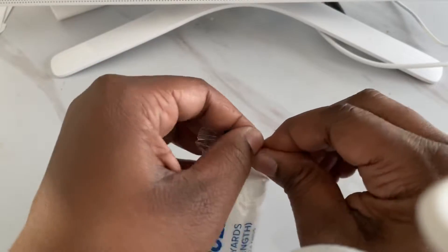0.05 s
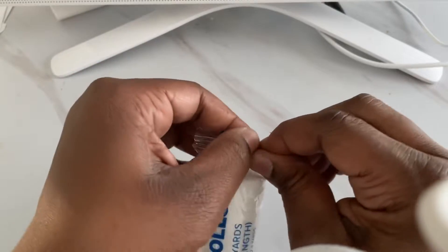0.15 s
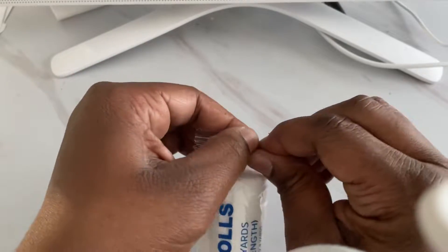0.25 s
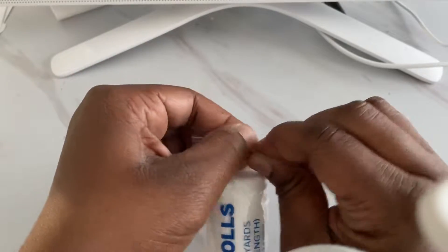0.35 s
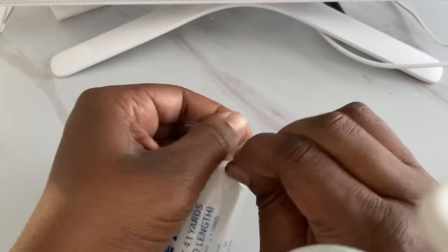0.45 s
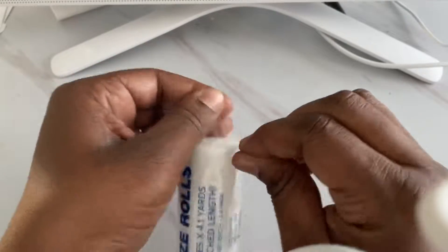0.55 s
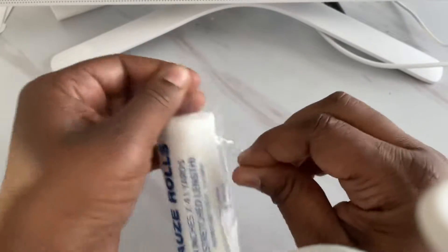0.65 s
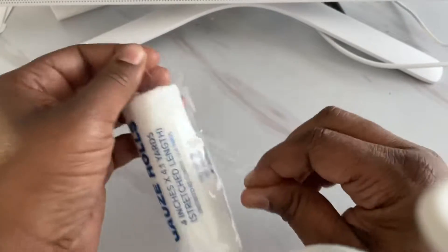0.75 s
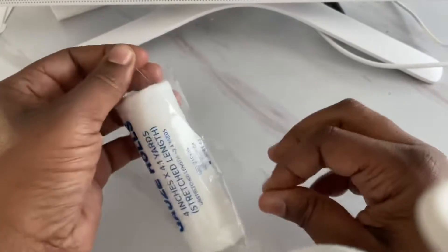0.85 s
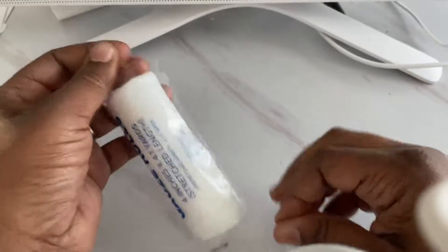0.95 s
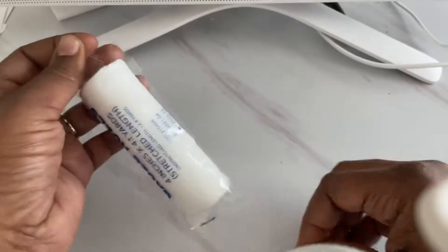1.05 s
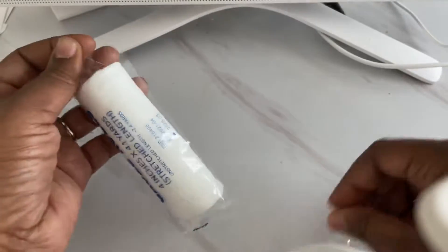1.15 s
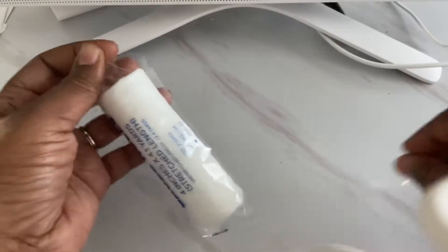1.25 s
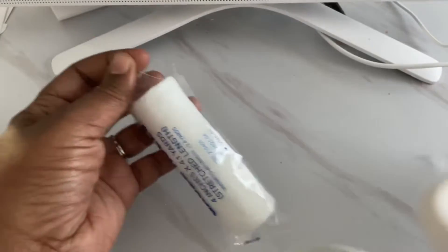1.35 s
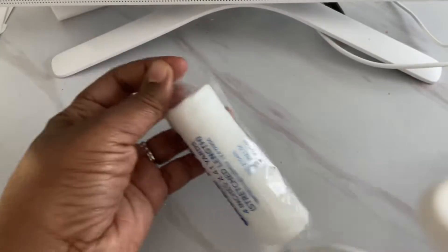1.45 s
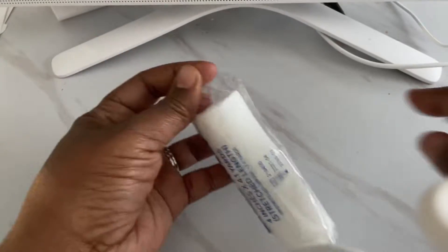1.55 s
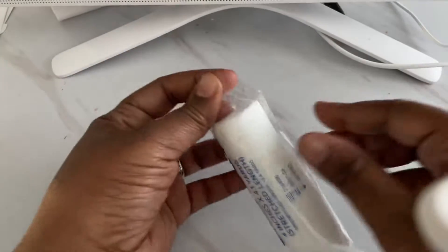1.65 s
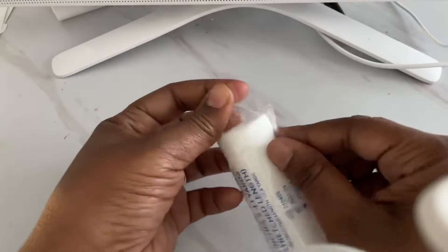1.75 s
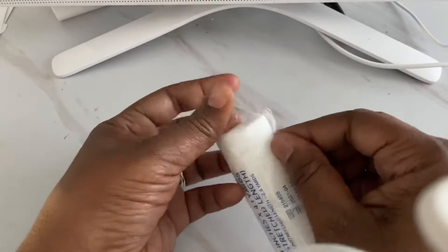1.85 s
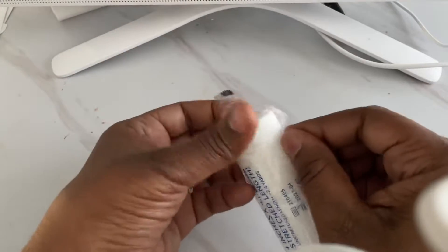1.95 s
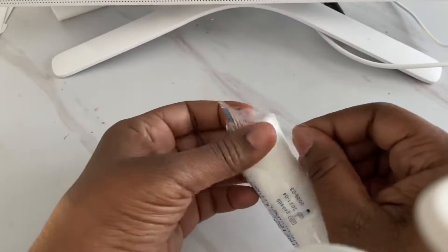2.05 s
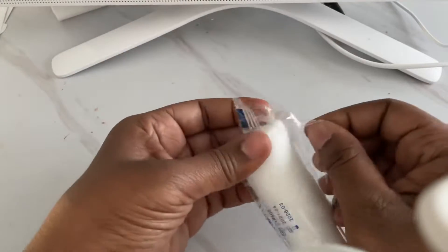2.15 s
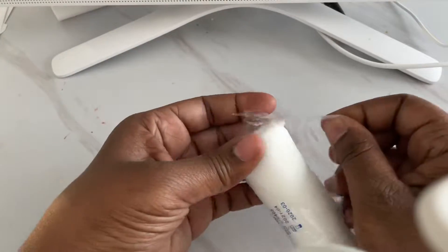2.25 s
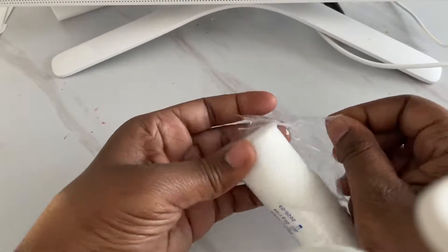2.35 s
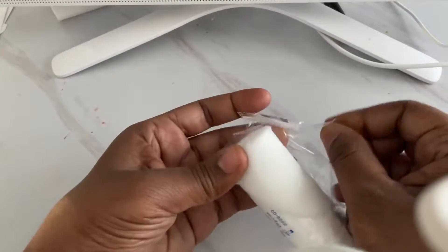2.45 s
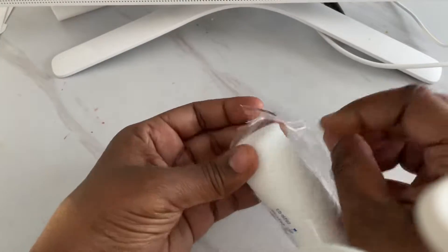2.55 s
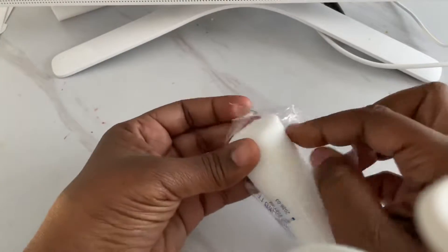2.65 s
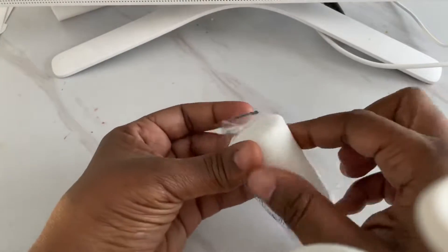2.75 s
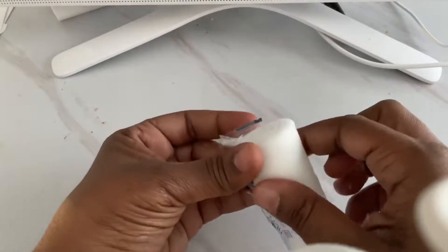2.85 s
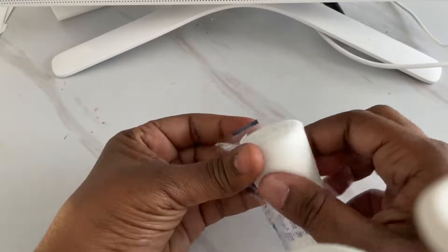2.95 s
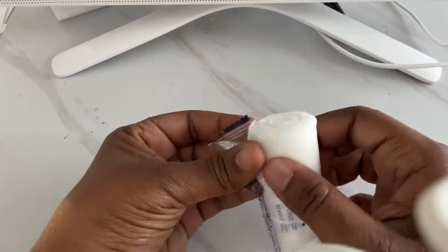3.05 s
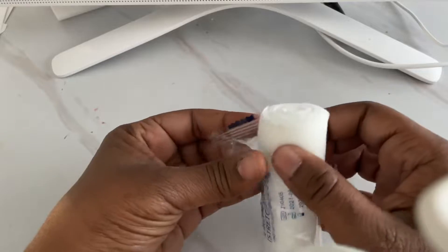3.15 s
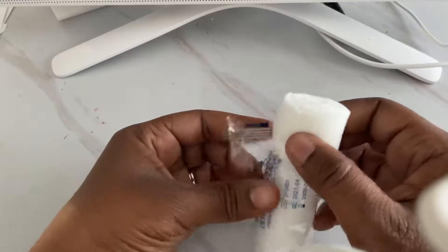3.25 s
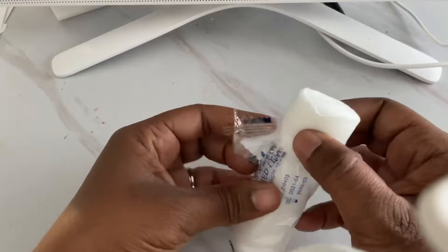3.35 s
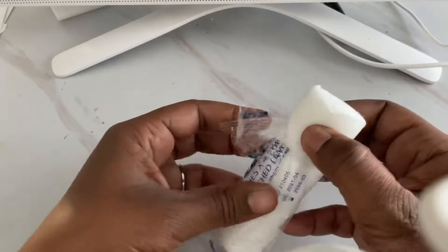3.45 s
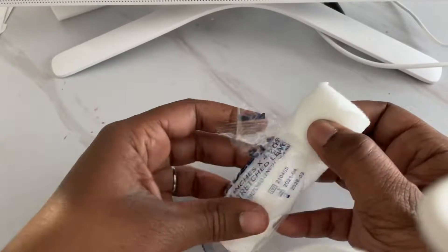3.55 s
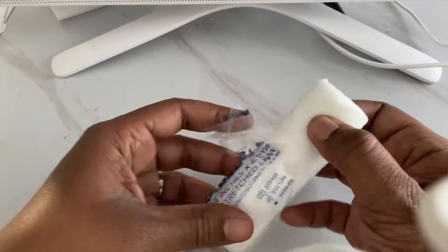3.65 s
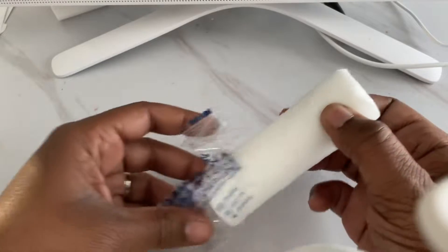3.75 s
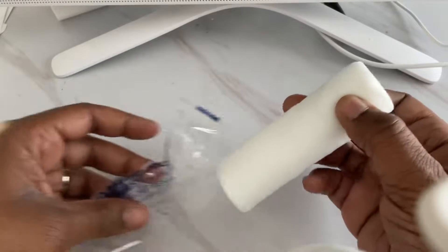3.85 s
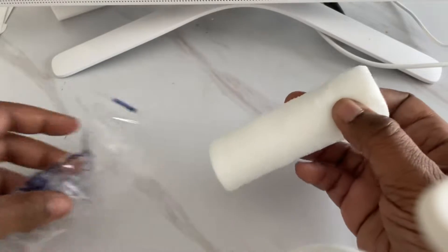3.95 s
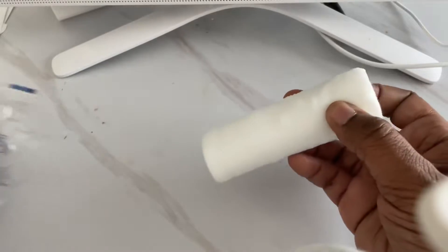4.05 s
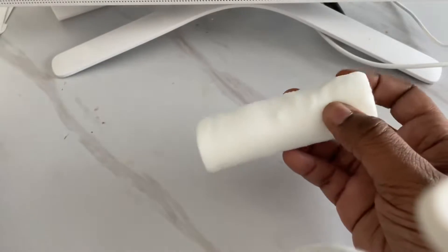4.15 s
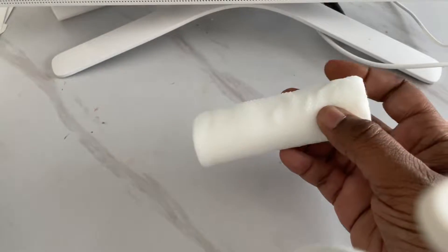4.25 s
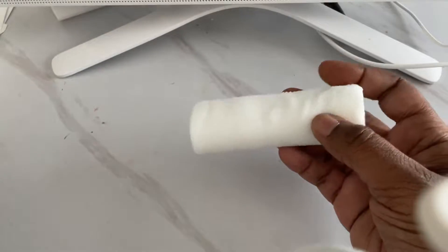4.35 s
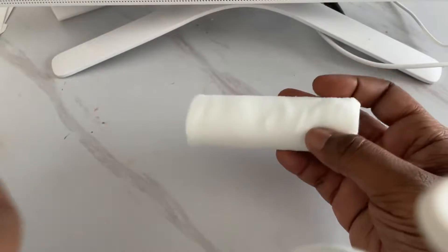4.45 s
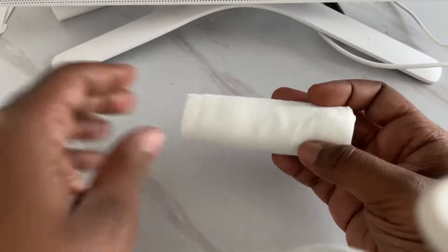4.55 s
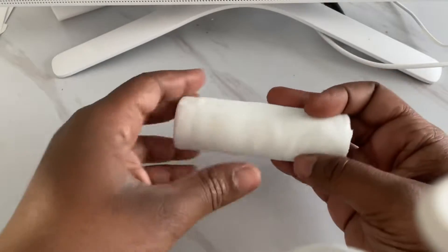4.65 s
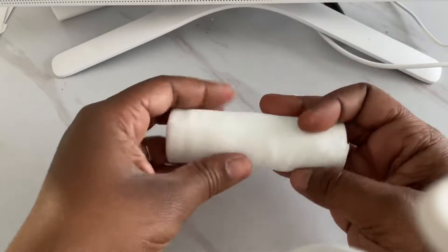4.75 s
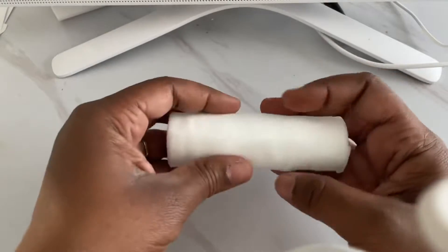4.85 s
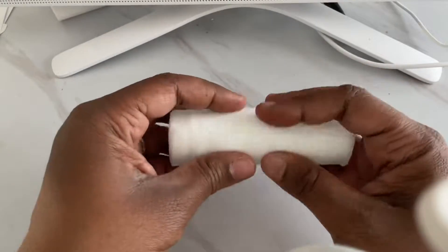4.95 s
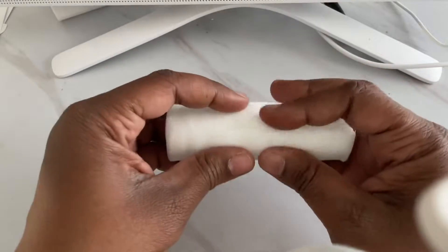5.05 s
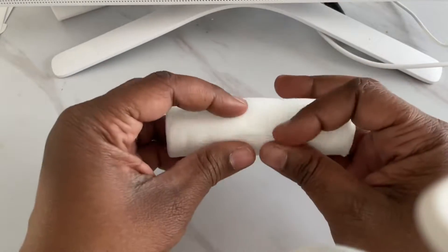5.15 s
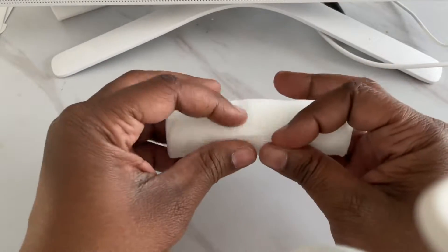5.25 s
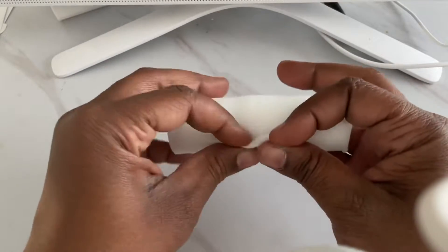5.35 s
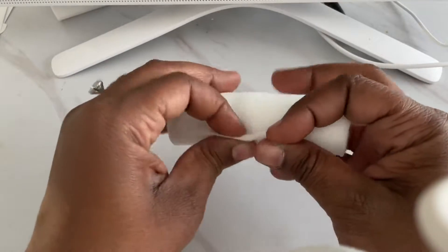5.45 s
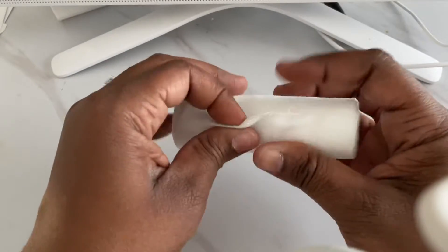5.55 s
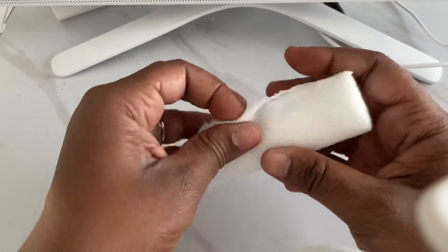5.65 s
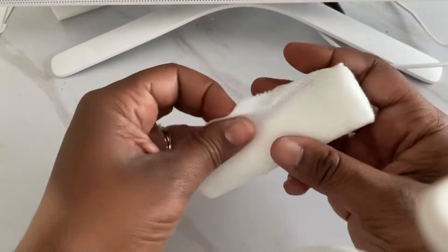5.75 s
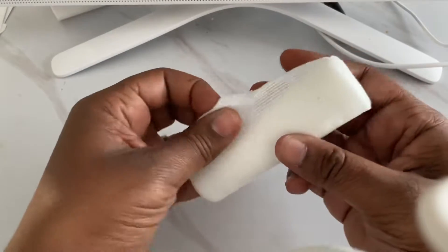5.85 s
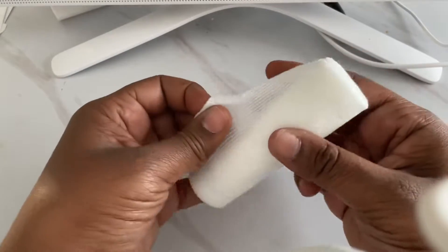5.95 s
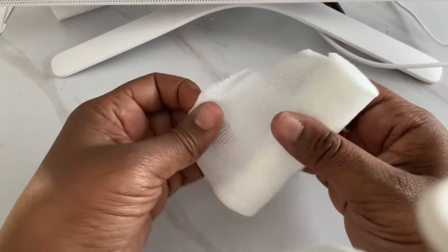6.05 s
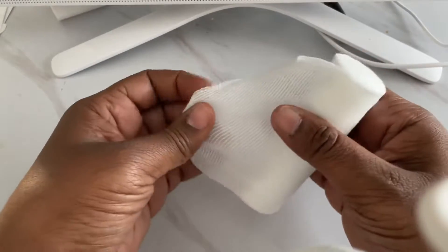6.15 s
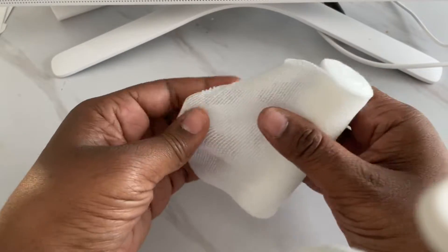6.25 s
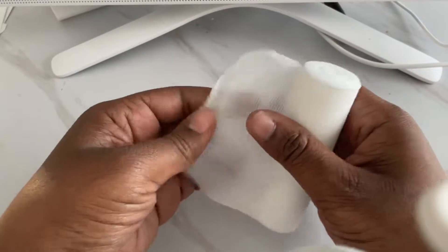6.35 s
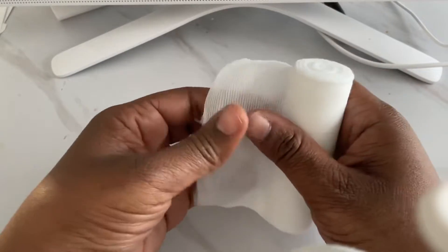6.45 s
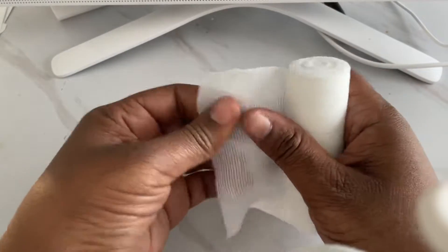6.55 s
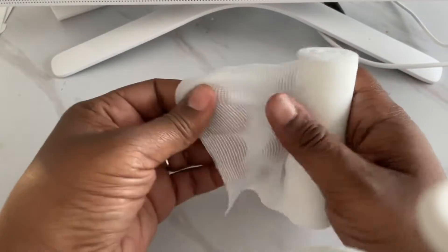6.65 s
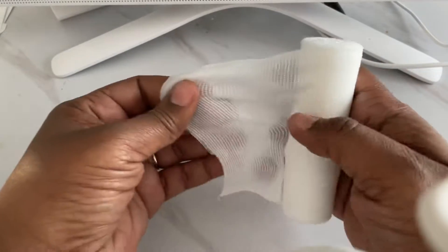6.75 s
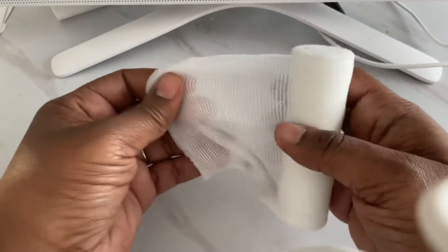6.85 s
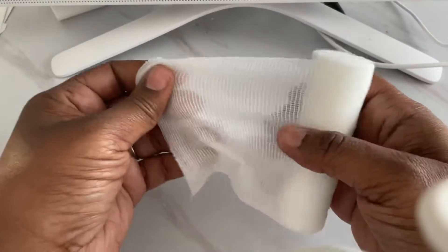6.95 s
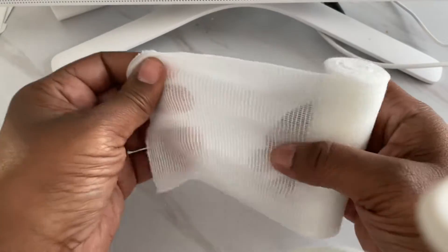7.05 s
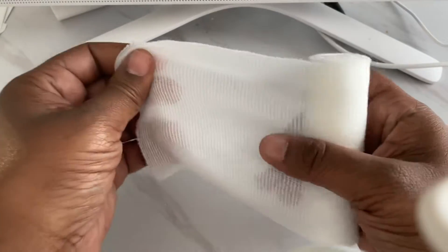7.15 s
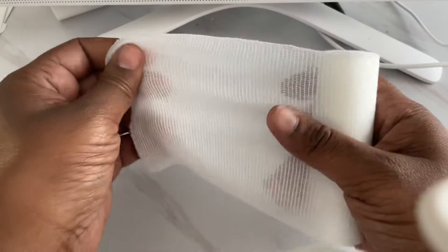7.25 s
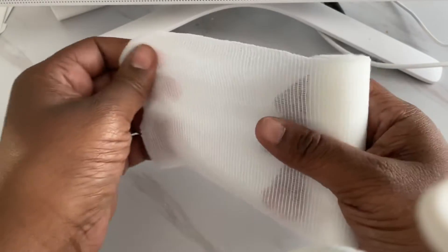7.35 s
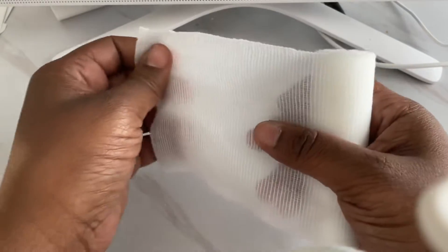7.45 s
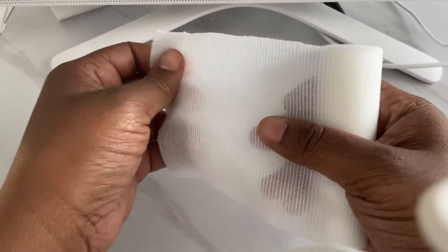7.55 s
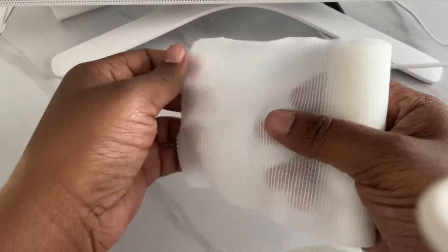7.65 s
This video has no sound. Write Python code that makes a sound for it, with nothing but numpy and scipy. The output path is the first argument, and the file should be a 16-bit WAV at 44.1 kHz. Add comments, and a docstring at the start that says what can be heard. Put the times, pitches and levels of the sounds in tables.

```python
"""A faint appliance hum and a fine crackle open the scene, close to the microphone: fingers grip thin plastic film.
They pinch and tear this wrapper off a gauze roll: creases buckle as dispersed, falling chirps that ring their folds.
The crackle is many tiny buckles, driven by the strain of each grip and fading as the film relaxes.
Damped modes give soft bumps on the roll, thin snaps give ticks, and shaped noise with thread plucks gives gauze strokes.
A band-by-band decaying echo makes the small room ring faintly."""
import sys
import numpy as np
from scipy import signal
from scipy.fft import rfft, irfft, next_fast_len
from scipy.io import wavfile
from scipy.ndimage import uniform_filter1d

SR = 44100
rng = np.random.default_rng(int(sys.argv[2]) if len(sys.argv) > 2 else 0)


def unload_audio(sound):
    """Save the sound as a 16-bit wav file, at the path given as the first command line argument."""
    columns = np.transpose(np.atleast_2d(sound))
    # keep every value between -1 and 1, then stretch to whole-number steps
    steps = np.round(np.clip(columns, -1, 1) * 32767)
    wavfile.write(sys.argv[1], SR, steps.astype(np.int16))


N = 339570
TIME = np.arange(N) / SR
PORTS = np.array([[.5], [-.5]])   # shares a left-right difference between the two channels
SNAP_SIZE, SNAP_LEAD = 1024, 128   # samples
SNAP_HZ = np.maximum(np.fft.rfftfreq(SNAP_SIZE, 1 / SR), 1)


def from_db(db):
    """Level law: amplitude is ten to the power of level over 20."""
    return 10 ** (np.asarray(db) / 20)


def rms_one(x):
    """Power normalisation: unit mean square."""
    return x / np.sqrt(np.mean(x ** 2) + 1e-20)


def at_hz(points, hz, axis=1):
    """Log-frequency interpolation of one column of a spectrum."""
    points = np.array(points)
    return np.interp(np.log(hz), np.log(points[:, 0]), points[:, axis])


def butter(x, hz, kind, order=2):
    """Butterworth filtering: a maximally flat pass band."""
    return signal.sosfilt(signal.butter(order, hz, kind, fs=SR, output="sos"), x)


def add(out, sound, start):
    """Superposition: mix a sound in from a given sample on."""
    start = int(np.clip(start, 0, N - 1))
    out[..., start:start + sound.shape[-1]] += sound[..., :N - start]


def drift(rate):
    """Random modulation: straight lines join normal draws of spread 1, at `rate` draws per second."""
    knots = rng.standard_normal(4096)
    return np.interp(TIME * rate, np.arange(len(knots)), knots)


# left-right coherence of a diffuse field: f/Hz, correlation
COHERENCE = [(60, .93), (300, 0.8), (700, 0.47), (1500, 0.82), (3000, 0.73), (7000, 0.18), (15000, 0.034)]


def diffuse_noise(colour, size=N):
    """Diffuse-field coherence: coloured stereo noise of rms 1, its ports most alike in the bass."""
    padded = next_fast_len(size)
    hz = np.maximum(np.fft.rfftfreq(padded, 1 / SR), 1)
    mid, side = rfft(rng.standard_normal((2, padded)))
    alike = np.clip(at_hz(COHERENCE, hz), -1, 1)
    both = np.sqrt(1 + alike) * mid + np.sqrt(1 - alike) * side * [[1], [-1]]
    return rms_one(irfft(both * from_db(at_hz(colour, hz)), padded)[:, :size])


# spectral density of the room background: f/Hz, relative level/dB per Hz
RUMBLE_COLOUR = [(20, -23), (35, -10), (55, 8.5), (75, 1.5), (100, -0.5), (170, -5), (230, -9.5),
                 (350, -19), (550, -33), (800, -28.5), (1200, -38), (2500, -33), (6500, -38), (8300, -57),
                 (11000, -36.5), (15500, -58)]


def appliance(hum_hz=120, hum_db=-48.5, rumble_db=-54, pan_db=-2.5, waver_db=2.0):
    """Mains-driven vibration: a wavering hum at twice the mains frequency, slightly right, over low rumble."""
    level_db = hum_db + waver_db * drift(7.9) + pan_db * PORTS
    hum = np.sqrt(2) * np.sin(2 * np.pi * hum_hz * TIME) * from_db(level_db)
    return hum + from_db(rumble_db) * diffuse_noise(RUMBLE_COLOUR)


def gesture(start, length, attack_db_per_s, release_db_per_s):
    """Exponential envelope: level in dB of one hand movement that swells, holds at 0 and dies away."""
    before = np.maximum(start - TIME, 0)
    after = np.maximum(TIME - start - length, 0)
    return -np.maximum(attack_db_per_s * before, release_db_per_s * after)


# pinches and pulls on the wrapper: t/s, length/s, relative level of the crackle body/dB, sizzle above the body/dB
GRIP_EVENTS = [(0, 0.12, -52.5, 1), (0.196, 0.0073, -43.5, 7.5), (0.422, 0.047, -33.5, 4.5),
               (0.517, 0.098, -39.5, 4), (0.654, 0.068, -38.5, 2), (0.823, 0.0075, -46.5, 6.5),
               (0.957, 0.11, -58.5, 8), (1.227, 0.079, -62, 4), (1.346, 0.11, -64, 11.5),
               (1.787, 0.13, -39.5, 2.5), (2.029, 0.073, -36.5, 3.5), (2.129, 0.27, -33, 5.5),
               (2.283, 0.084, -32.5, 7), (2.524, .17, -35.5, 4), (2.761, 0.087, -38, 5.5),
               (2.968, 0.14, -44, 7), (3.144, 0.063, -41.5, 4.5), (3.248, 0.1, -39, 2),
               (3.38, .11, -52, 6.5), (3.472, 0.076, -36.5, 3), (3.611, 0.2, -42.5, 8),
               (3.784, 0.084, -35.5, 1.5), (4.109, 0.019, -38.5, 0), (4.65, 0.029, -50, -2)]


def strain(attack_db_per_s=901.5, release_db_per_s=453, relax_db=-13, relax_db_per_s=61.5):
    """Stress relaxation: the strongest grip, or its slow creaking afterwards, sets body and sizzle in dB."""
    body = sizzle = np.full(N, -120.)
    for s, length, db, bright_db in GRIP_EVENTS:
        held = gesture(s, length, attack_db_per_s, release_db_per_s)
        relaxing = relax_db + gesture(s, length, attack_db_per_s, relax_db_per_s)
        level = db + np.maximum(held, relaxing)
        body = np.maximum(body, level)
        sizzle = np.maximum(sizzle, level + bright_db)
    return body, sizzle


def resonance(hz, q, gain_db):
    """Resonance: unity response plus a peak whose width is its frequency over q."""
    detune = SNAP_HZ / hz - hz / SNAP_HZ
    return 1 + (from_db(gain_db) - 1) / (1 + 1j * q * detune)


def crease_paths(fold_hz, scatter_db, scatter_s=.003, spread_s=.000004, count=16):
    """Multipath superposition: spectra at both ports of a swell of tiny flips and its scattered echoes."""
    swell_s = 0.0003343 * (3000 / fold_hz) ** .3   # small, high folds give way faster
    flips = rng.gamma(3, swell_s, count)
    # echoes off hands and table follow the flips
    delay = np.r_[flips, rng.exponential(scatter_s, count) + 2 * swell_s]
    size = np.r_[np.exp(-flips / (10 * swell_s)), np.full(count, from_db(scatter_db))]
    height = rng.choice([-1, 1], 2 * count) * size
    # each path has its own direction, and all share one more
    lag = spread_s * (rng.standard_normal(2 * count) + rng.standard_normal()) / 2
    arrival = np.array([delay - lag, delay + lag]) - np.median(flips)
    return (height[:, None] * np.exp(-2j * np.pi * arrival[..., None] * SNAP_HZ)).sum(1)


def table_echo(delay_s=0.0021, echo_db=-10, spread=.12):
    """Comb filtering: the table top returns each snap after a delay varying with the height of the hands."""
    echo_s = delay_s * np.exp(spread * rng.standard_normal())
    return 1 + from_db(echo_db) * np.exp(-2j * np.pi * echo_s * SNAP_HZ)


def bending_phase(travel_s=.0015):
    """Bending-wave dispersion: delay is travel * (sqrt(1 kHz / f) - 1/2), so treble arrives first."""
    travel = travel_s * np.exp(rng.normal(0, .3))
    return 2 * np.pi * travel * (2 * np.sqrt(1e3 * SNAP_HZ) - SNAP_HZ / 2)


# phase between the two microphone ports: f/Hz, lead of the left port/rad
PORT_LEAD = [(100, 1.2), (1500, -0.13), (2700, 1.5), (4000, 0.06), (5000, 0.91), (6200, 1.02),
             (7000, -1.04), (7800, -3), (8700, -3.5), (10600, -6), (12200, -6.5), (14000, -9), (15500, -9)]
# level between the two microphone ports: f/Hz, left minus right level/dB
PORT_LEVEL = [(200, 0), (1000, 2.4), (2700, 2.5), (4800, 4), (7000, 1.1), (9000, 0), (15000, 0)]


def snap(colour, fold_hz, fold_db, fold_q=2.3, overtone_db=3.5, overtone_q=3.8, scatter_db=-17,
         splay=0.8, splay_hz=3300, lead_s=0):
    """Snap-through buckling: tiny flips launch a dispersed bending wave that rings the fold and taut facets."""
    paths = crease_paths(fold_hz, scatter_db)
    for hz in np.exp(rng.uniform(np.log(1800), np.log(14000), size=6)):   # facets ring at their own pitches
        paths *= resonance(hz, overtone_q, overtone_db)
    # level the broad spectrum, keep its fine structure
    paths /= np.sqrt(uniform_filter1d(np.mean(abs(paths) ** 2, 0), size=41) + 1e-9)
    detune = SNAP_HZ / fold_hz - fold_hz / SNAP_HZ
    fold = resonance(fold_hz, fold_q, fold_db)
    fold *= from_db(-.55 * fold_db / (1 + detune ** 2))   # the ring draws its energy from nearby frequencies
    paths *= table_echo()
    bend = bending_phase()
    gain = from_db(at_hz(colour, SNAP_HZ) + PORTS * at_hz(PORT_LEVEL, SNAP_HZ))
    # each snap faces its own way, heard most in the middle range
    aim = splay * rng.standard_normal() * np.exp(-np.log(SNAP_HZ / splay_hz) ** 2)
    aim += 2 * np.pi * np.minimum(lead_s * SNAP_HZ, 1)   # a time lead in the lower range, one turn at most
    phase = PORTS * (at_hz(PORT_LEAD, SNAP_HZ) + aim) - bend
    wave = irfft(paths * fold * gain * np.exp(1j * phase))
    return np.roll(wave, SNAP_LEAD, axis=1) * signal.windows.tukey(SNAP_SIZE, .2)


# spectral density of the fine crackle: f/Hz, relative level/dB per Hz
FINE_CRACKLE_COLOUR = [(100, -24.5), (250, -4), (450, -12.5), (950, 1), (1500, 6), (1750, -1.5), (2100, 7),
                       (3500, 2), (5800, -3), (8000, -4), (11000, -5.5), (15500, -26.5)]


def crackle(body, sizzle, per_s=600, size_db=4.0, clump_db=3.0, body_db=-2.0, sizzle_db=-3, hiss_db=-35,
            fold_db=7, tilt_db=4.0, size=130, count=120):
    """Crackling noise: clumped random buckles excite a new fold every `size` samples, about 3 ms."""
    born = rng.random(N) < per_s / SR
    sizes = born * from_db(size_db * np.minimum(rng.exponential(1, N), 3))
    sizes += from_db(hiss_db) * rng.standard_normal(N)
    sizes *= from_db(clump_db * np.tanh(drift(110)))
    sizes /= np.sqrt(uniform_filter1d(sizes ** 2, size=2400) + 1e-12)   # a steady pull releases steady energy
    folds = []
    for fold_hz in np.geomspace(1200, 12000, count):
        tilt = tilt_db * np.clip(rng.standard_normal(), -2, 2)   # some folds are bright, some dull
        colour = [(hz, db + tilt * np.log(hz / 3300)) for hz, db in FINE_CRACKLE_COLOUR]
        folds.append(snap(colour, fold_hz, fold_db))
    film, end = np.zeros((2, N)), int((GRIP_EVENTS[-1][0] + .5) * SR)
    for start in range(0, end, size):
        fold = folds[rng.integers(count)]
        grains = np.array([np.convolve(sizes[start:start + size], port) for port in fold])
        add(film, grains, start - SNAP_LEAD)
    low = butter(film, 3700, "low", order=3)
    high = butter(film, 3000, "high", order=3)
    low *= from_db(body + body_db) / low[:, :end].std()
    high *= from_db(sizzle + sizzle_db) / high[:, :end].std()
    return low + high


def tilted(colour, tilt, pivot_hz=3100):
    """Spectral tilt in dB per octave about a pivot: small, tight creases are bright, wide ones dull."""
    return [(hz, db + tilt * np.log2(np.clip(hz, 650, 11500) / pivot_hz)) for hz, db in colour]


# spectral density shared by all film snaps before tilting: f/Hz, relative level/dB per Hz
FILM_SNAP_COLOUR = [(60, -30), (300, -19), (650, -5), (1800, 1.5), (5000, -0.74), (8500, 0), (11500, -5),
                    (15500, -7.5)]


def lesser_creases(sizzle, above_db=18.5, spread_db=5.0, tilt_db=2.5, tilt_spread_db=5.5, fold_db=11, count=130):
    """Strain-limited buckling: smaller snaps at random times, their strength following the sizzle level."""
    out, end = np.zeros((2, N)), int(sum(GRIP_EVENTS[-1][:2]) * SR)
    for k, (when, size, tilt, pitch) in enumerate(rng.uniform(-1.3, 1, (count, 4))):
        start = int((k + (1 + when) / 2) * end / count)
        colour = tilted(FILM_SNAP_COLOUR, tilt_db + tilt_spread_db * tilt)
        wave = snap(colour, 3800 * 2 ** pitch, fold_db)
        add(out, from_db(sizzle[start] + above_db + spread_db * size) * wave, start - SNAP_LEAD)
    return out


# creases buckling: t/s, relative level/dB, tilt/dB per octave, f of the fold's ring/Hz
CREASE_EVENTS = [(0.0655, -6.5, 1, 2100), (0.0923, -26.5, 5, 3500), (0.1109, -2.5, 2, 5650),
                 (0.1874, -20, 8.5, 9650), (0.1974, -4.5, -1, 5390), (0.2086, -4.5, -0.1, 2240),
                 (0.2138, -11, 2, 3860), (0.299, -17, 3.5, 5200), (0.3187, -2.5, -3.5, 1586),
                 (0.3614, -8.5, 0.5, 8140), (0.3793, 3, 3.5, 7560), (0.3814, -3, -2.5, 4800),
                 (0.4094, -5.5, 6, 8010), (0.413, -14, 6.5, 6000), (0.424, -4, -1, 4700),
                 (0.4377, 6.5, 0.5, 1990), (0.445, 6, -3, 6460), (0.4519, 5.5, 2.5, 2050),
                 (0.462, -11.5, -5.5, 1500), (0.4712, 0, -4.5, 2000), (0.4857, -4.5, 4.5, 7350),
                 (0.545, -7, 4, 1950), (0.5605, -9, -6.5, 1600), (0.5766, -9.5, -5.5, 3300),
                 (0.639, -2, -2, 10000), (0.6769, -6, -7, 1930), (0.6868, -1.5, 0.5, 1880),
                 (0.725, -1, -3.5, 2010), (0.7403, -14.5, 0.5, 2000), (0.7725, -19.5, 6.5, 4430),
                 (0.8262, -19, 10, 10210), (0.837, -20.5, 8, 10570), (0.8488, -21, -10, 2100),
                 (0.8762, -18.5, 2.5, 4200), (0.8918, -5, 0, 7500), (0.9661, -7.5, -4, 2480),
                 (0.9815, -11, 11, 11100), (0.9915, -7.5, 6.5, 5300), (1.0, -23, 10, 10500),
                 (1.0465, -16.5, -1.5, 5500), (1.056, -26.5, 12.5, 12200), (1.125, -23.5, 3, 9800),
                 (1.1416, -21, 4, 6400), (1.235, -11.5, -3.5, 4600), (1.2467, -28, 9.5, 6050),
                 (1.287, -34, 9, 5900), (1.3712, -17, 5, 5260), (1.378, -18, 9.5, 9200),
                 (1.405, -20.5, 4, 12100), (1.4353, -26.5, -4, 3180), (1.4594, -23, -2.5, 2400),
                 (1.5435, -9, 1.5, 8650), (1.603, -12.5, 1.5, 5740), (1.6258, -17.5, -5, 2180),
                 (1.761, -19, -5.5, 2180), (1.7794, -9, 0.5, 5030), (1.8011, 0.5, 0.5, 4820),
                 (1.839, -22.5, -4.5, 3500), (1.8525, 1, -3.5, 6450), (1.8552, -7, 2, 3900),
                 (1.8726, -6, 0.5, 6030), (1.8988, -4, -2.5, 2210), (1.929, -11, 3, 11500),
                 (1.9626, -12.5, 1, 4970), (1.9935, 4, -1, 2493), (2.018, -5, 3.5, 11800),
                 (2.0226, -5, -2.5, 4440), (2.0271, -9, 0.5, 5000), (2.0403, -0.5, -0.5, 2574),
                 (2.049, -11.5, 5, 7000), (2.055, -5, -5, 1030), (2.0925, -3.5, -4, 2400),
                 (2.1255, -4.5, 0.5, 3400), (2.136, -1, -1.5, 2000), (2.1462, -1.5, -0.5, 2270),
                 (2.1667, 8.5, 0, 2870), (2.1709, -0.5, -3, 3600), (2.2107, 0.5, -2.5, 2730),
                 (2.2305, -3.5, -0.5, 3300), (2.2536, 0.5, -1.5, 5230), (2.28, 6, -2.5, 1380),
                 (2.2893, 1.5, 1, 1400), (2.308, 1.5, 1.5, 3670), (2.311, 2.5, 0, 8500),
                 (2.3231, 7, -3, 7400), (2.331, 8.5, 1, 8560), (2.3638, 1.5, -1, 7040),
                 (2.3723, -1.5, -1, 4970), (2.3944, 4.5, -3.5, 3300), (2.4024, -1.5, 5, 990),
                 (2.4246, 3, -4, 1270), (2.4332, -8.5, 7, 2000), (2.4487, -3.5, 0.5, 3700),
                 (2.4613, -11, 4.5, 4700), (2.491, -7, -1.5, 2970), (2.5152, -6.5, -1.5, 4400),
                 (2.5258, 1.5, -3.5, 3620), (2.5394, -18, 11, 6520), (2.5768, 3.5, 0.5, 7100),
                 (2.589, -5.5, 8, 5200), (2.6129, -2, 3.5, 4640), (2.653, 1, 0.5, 6960),
                 (2.641, -1, -4.5, 3600), (2.6724, -7, 1, 5520), (2.701, -10, 4, 4840),
                 (2.7076, -4.5, 2, 7960), (2.759, -3, -2, 2122), (2.7777, 0, -1.5, 1990),
                 (2.791, -1, 0.5, 4740), (2.8421, -6.5, 4.5, 9800), (2.849, -2, -1, 7700),
                 (2.9092, -12, 4.5, 6400), (2.9145, -3.5, 1, 7960), (2.948, -8.5, 0.5, 4740),
                 (2.9723, -1, -1, 8560), (2.977, -1, 0, 5760), (3.0047, -5.5, -1.5, 8000),
                 (3.0375, -9, 2, 4200), (3.05, -5.5, 0, 2420), (3.0596, -4, 0, 2287),
                 (3.0751, 0, -1.5, 1460), (3.0897, -8, 0.5, 3000), (3.1379, -10, 0, 3900),
                 (3.16, 2.5, 1, 6550), (3.1733, -5, 1, 5500), (3.231, -16.5, 4.5, 4200),
                 (3.246, -10, -2, 5200), (3.2544, 2.5, 0.5, 7200), (3.257, -2, -6, 2220),
                 (3.266, -9.5, 7.5, 6960), (3.285, -3.5, 4.5, 8400), (3.304, -1, 2.5, 9400),
                 (3.3129, 6, -1, 3820), (3.3722, -13, -4, 4340), (3.421, -10, 0.5, 5800),
                 (3.438, -3, -0.5, 4040), (3.4637, -9.5, -1.5, 5970), (3.499, -7.5, 1, 2330),
                 (3.5077, -1.5, 2.5, 5160), (3.5131, -11, -7, 2000), (3.533, 0, -1.5, 3400),
                 (3.541, 3.5, 0, 2570), (3.559, -5, -2.5, 3600), (3.593, -1, -2, 2570),
                 (3.609, -16.5, 7.5, 1793), (3.612, 0.5, -5.5, 2780), (3.652, 0, 1, 4170),
                 (3.671, 2.5, 4, 6850), (3.674, -17, -4.5, 5000), (3.7018, -4.5, -4, 2580),
                 (3.7292, -7.5, -4.5, 3320), (3.739, 1, 0, 3030), (3.751, -3, -1, 5570),
                 (3.7698, 3, -0.5, 7600), (3.7793, -15, -3, 4500), (3.7977, 8, -2.5, 7550),
                 (3.804, 5, -2, 7500), (3.8083, -13, 12, 6000), (3.8281, -2.5, 4, 4494),
                 (3.8466, -6.5, 0.5, 2960), (3.857, 1, -3.5, 1000), (3.865, -9.5, 5.5, 3450),
                 (3.942, -23, -2, 2320), (3.9662, -6, 1, 5900), (4.089, -14, 0, 3200),
                 (4.096, -0.5, -2.5, 2030), (4.1129, -3.5, 3.5, 3670), (4.179, 2.5, 0.5, 3520),
                 (4.181, -4, -6.5, 6240), (4.19, -11, -5, 2620), (4.2136, -7, -2.5, 8600),
                 (4.4286, -10, -3.5, 3070), (4.63, -15.5, 3.5, 6160), (4.648, -2, -2, 5600)]


def creases(level_db=0.0, fold_db=14.5, fold_q=4.25, overtone_db=6.0, ring_db_per_octave=2,
            aside_s=4.05, aside_lead_s=0.00031):
    """Fold resonance: single loud snaps, each with its own ring, strongest in wide, low folds."""
    out = np.zeros((2, N))
    for s, db, tilt, fold_hz in CREASE_EVENTS:
        ring_db = fold_db + ring_db_per_octave * np.log2(3100 / fold_hz)
        # the empty wrapper is carried off to the left: its lower sounds then reach the left port first
        lead_s = aside_lead_s * (s > aside_s)
        wave = snap(tilted(FILM_SNAP_COLOUR, tilt), fold_hz, ring_db, fold_q, overtone_db, lead_s=lead_s)
        add(out, from_db(db + level_db) * wave, round(s * SR) - SNAP_LEAD)
    return out


# the room's echo: f/Hz, level relative to the direct sound/dB, t60/s
ROOM_DECAY = [(150, -4, 0.26), (700, -9, 0.22), (2000, -11.5, 0.48), (4930, -10.5, 0.25),
              (9700, -19.5, 0.11), (16000, -12, 0.083)]


def room(dry, gap_s=0.0054, build_s=0.001):
    """Reverberant decay: a diffuse echo dies exponentially, at its own rate in each band."""
    t = TIME[:SR * 3 // 4]
    white = diffuse_noise([(20, 0), (20000, 0)], size=len(t))
    edges, tail = np.geomspace(100, 18000, 12), 0
    for low, high in zip(edges, edges[1:]):
        hz = np.sqrt(low * high)
        fade = from_db(-60 * t / at_hz(ROOM_DECAY, hz, axis=2)) * np.clip((t - gap_s) / build_s, 0, 1)
        fade *= from_db(at_hz(ROOM_DECAY, hz)) / np.linalg.norm(fade)
        tail = tail + butter(white, [low, high], "band") * fade
        white = np.roll(white, len(t) // 13, axis=1)
    narrowed = dry.mean(0)[None] / 2 + dry / 2
    return signal.fftconvolve(narrowed, tail, axes=1)[:, :N]


# soft bumps of fingers on the roll: t/s, relative level/dB, f/Hz, t60/s
BUMP_EVENTS = [(0.38, -22, 474, 0.015), (0.438, -21, 460, 0.036), (0.964, -24.5, 373, 0.018),
               (2.167, -22.5, 212, 0.041), (2.636, -21.5, 276, 0.014), (3.798, -34, 309, 0.11),
               (3.853, -34, 298, 0.045), (4.178, -27, 249, 0.048), (4.428, -29, 676, 0.028),
               (4.649, -36.5, 295, 0.052), (4.752, -45, 421, 0.032), (5.59, -22.5, 268.6, 0.029),
               (6.857, -40.5, 393, 0.019), (6.862, -27, 109, 0.068)]


def bumps(level_db=-3, puff_db=-10, puff_ratio=2.4, puff_t60=0.035):
    """Damped modal vibration: a padded knock rings unrelated modes, with a short dull puff from the cotton."""
    out, t = np.zeros(N), TIME[:SR // 4]
    shares = [(.68, 0.18), (1, -0.56), (1.3, 0.55), (1.7, -0.13), (2.3, 0.015), (3.1, -.1)]   # f ratio, amplitude
    for s, db, hz, t60 in BUMP_EVENTS:
        modes = sum(share * np.sin(2 * np.pi * hz * ratio * t) * from_db(-60 * t * np.sqrt(ratio) / t60)
                    for ratio, share in shares)
        puff = rms_one(butter(rng.standard_normal(len(t)), puff_ratio * hz, "low", order=3))
        puff *= from_db(puff_db - 60 * t / puff_t60)
        add(out, from_db(db + level_db) * (modes + puff), round(s * SR))
    return out


def rubbing(rub_db, colour, level_db, catch_db, patch_db=4.5, shifts_per_s=22):
    """Stick-slip friction: skin or threads give a soft, grainy hiss whose colour shifts with the contact."""
    hiss = diffuse_noise(colour)
    edges = [100, 1500, 2300, 3300, 4700, 7500, 16000]   # Hz
    patches = sum((-1) ** k * butter(hiss, band, "band") * from_db(patch_db * drift(shifts_per_s))
                  for k, band in enumerate(zip(edges, edges[1:])))
    return from_db(rub_db + level_db + catch_db * drift(300)) * rms_one(patches)


# a fingertip sliding along the wrapper: t/s, relative level/dB
SLIDE_LEVEL = [(1.53, -75), (1.548, -51), (1.6, -46.5), (1.66, -51.5), (1.71, -45.5), (1.74, -53),
               (1.78, -73)]
# spectral density of the slide: f/Hz, relative level/dB per Hz
FINGER_COLOUR = [(300, -6), (1100, 0.5), (1500, -0.5), (2100, 2), (3200, -5.5), (5300, -0.5), (7200, -6),
                 (8300, -32), (10000, -3), (12500, -12), (15500, -42)]


def finger_slide():
    """Sliding friction: a fingertip hisses along the film under a level curve, silent before and after."""
    slide_db = np.interp(TIME, *np.transpose(SLIDE_LEVEL), left=-120, right=-120)
    return rubbing(slide_db, FINGER_COLOUR, level_db=-3.5, catch_db=3.5)


# spectral density of the brushing hand: f/Hz, relative level/dB per Hz
HAND_COLOUR = [(200, -9.5), (500, -2.5), (750, 6), (1200, -9), (2500, -10), (6000, -11), (15000, -50)]


def hand_brush(start_s=4.416, length_s=0.3, brush_db=-64.5):
    """Sliding friction: a hand brushes dully past while the wrapper is put aside."""
    rub_db = brush_db + gesture(start_s, length_s, attack_db_per_s=55.5, release_db_per_s=59)
    return rubbing(rub_db, HAND_COLOUR, level_db=1.5, catch_db=1.5, patch_db=-4.5)


# nails and threads catching on the roll: t/s, relative level/dB, tilt/dB per octave, f of the ring/Hz
TICK_EVENTS = [(4.5483, -15, 1, 2570), (4.7514, -8.5, 4.5, 2200), (4.76, -21, 4, 2580),
               (5.2916, -12, 3.5, 2670), (5.5906, -8.5, -4.5, 2080), (6.857, -28, 2, 2300),
               (7.0261, -18, -1, 2700), (7.228, -22.5, 2, 4300)]
# spectral density of a tick before tilting: f/Hz, relative level/dB per Hz
CATCH_COLOUR = [(200, -35), (1000, -7.5), (1550, -10.5), (2100, 5), (3000, 0.5), (4500, -7.5),
                (7000, -14.5), (8300, -14), (11000, -18.5), (15500, -16)]


def ticks(fold_db=8, fold_q=3):
    """Sudden release: a nail or a thread slips free with a thin, briefly ringing tick."""
    out = np.zeros((2, N))
    for s, db, tilt, ring_hz in TICK_EVENTS:
        wave = snap(tilted(CATCH_COLOUR, tilt), ring_hz, fold_db, fold_q, overtone_db=3.0, scatter_db=-18)
        add(out, from_db(db) * wave, round(s * SR) - SNAP_LEAD)
    return out


# spectral density of gauze hiss and thread plucks: f/Hz, relative level/dB per Hz
COTTON_COLOUR = [(150, -43.5), (400, -10), (1100, -7), (1650, -5), (2100, 2), (3000, 4), (3600, -1.5),
                 (4300, 0.5), (5300, -4.5), (7000, -6), (8300, -35), (9500, -6), (11500, -13), (13500, -17),
                 (15500, -52)]


def threads(rub_db, per_s=230, thread_db=-7.5, spread_db=3.6, count=14):
    """Random plucking: single threads slip free under a stroke as uneven ticks, each with its own pitch."""
    sizes = (rng.random(N) < per_s / SR) * from_db(spread_db * np.minimum(rng.exponential(1, N), 3))
    plucks = [snap(COTTON_COLOUR, hz, fold_db=9) for hz in np.geomspace(2000, 5500, count)]
    out = np.zeros((2, N))
    for start in np.flatnonzero(sizes):
        add(out, sizes[start] * plucks[rng.integers(count)], start)
    return from_db(rub_db + thread_db) * rms_one(out)


# gauze rubbing on fingers and peeling off the roll: t/s, length/s, relative level/dB
STROKE_EVENTS = [(4.764, 0.081, -64.5), (4.996, .027, -64.5), (5.124, 0.081, -59), (5.303, 0.073, -58.5),
                 (5.545, 0.13, -60), (5.812, 0.059, -61), (5.942, 0.26, -61), (6.302, 0.13, -67),
                 (6.571, .03, -63), (6.718, 0.043, -62), (6.844, 0.022, -61.5), (6.98, 0.11, -62),
                 (7.18, 0.076, -62), (7.291, 0.047, -64), (7.475, 0.23, -71)]


def gauze_strokes():
    """Fibre friction: each stroke swells and dies as grainy hiss with thread plucks on top."""
    strokes = [db + gesture(s, length, attack_db_per_s=260, release_db_per_s=159)
               for s, length, db in STROKE_EVENTS]
    rub_db = np.max(strokes, axis=0)
    hiss = rubbing(rub_db, COTTON_COLOUR, level_db=-5.0, catch_db=0.5, patch_db=2.5)
    return hiss + threads(rub_db)


def scene():
    """Superposition of direct sound and room echo: hands, film and gauze in the humming room."""
    body, sizzle = strain()
    film = lesser_creases(sizzle) + crackle(body, sizzle)
    handling = film + bumps() + finger_slide()
    # the room hears each snap from all sides, so single rings stand out less in its echo
    all_round = creases(level_db=-0.5, fold_db=9.5, fold_q=3.7, overtone_db=0.0) + ticks(fold_db=-2.0)
    direct = handling + creases() + ticks() + hand_brush() + gauze_strokes()
    return direct + room(handling + all_round) + appliance()


def record(dry):
    """Band limiting: an elliptic low-pass cuts the top steeply above 15.6 kHz."""
    return signal.sosfilt(signal.ellip(10, .2, 80, 15600, fs=SR, output="sos"), dry)


dry = scene()
out = record(dry)
unload_audio(out)
```